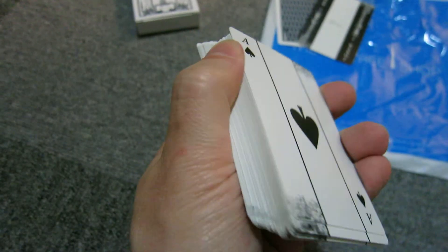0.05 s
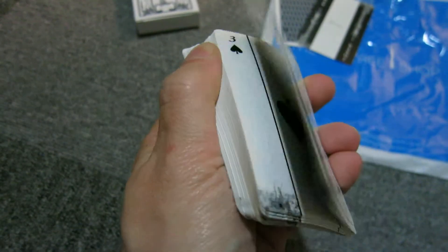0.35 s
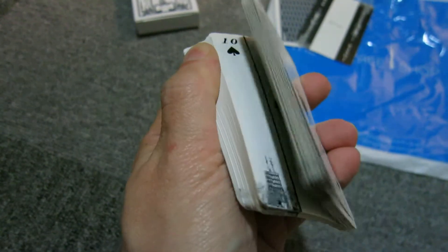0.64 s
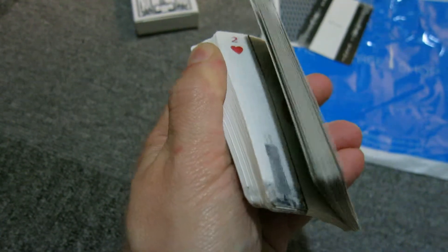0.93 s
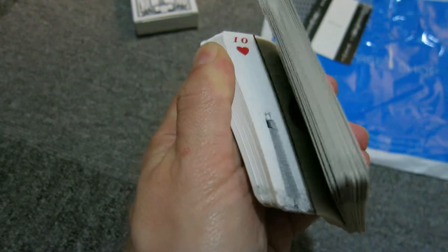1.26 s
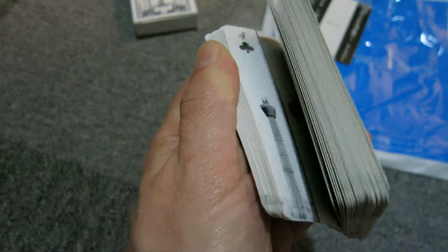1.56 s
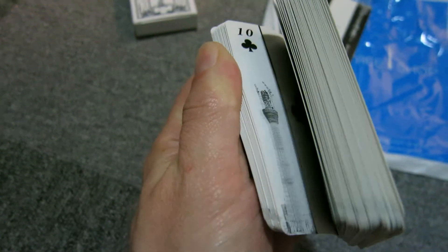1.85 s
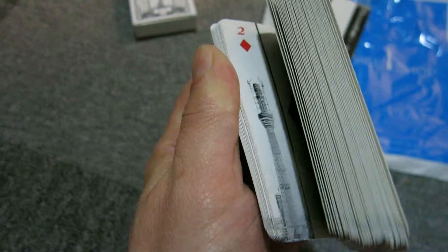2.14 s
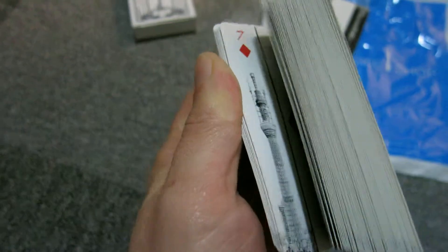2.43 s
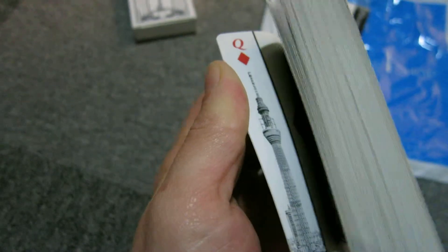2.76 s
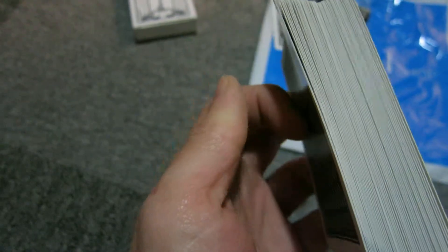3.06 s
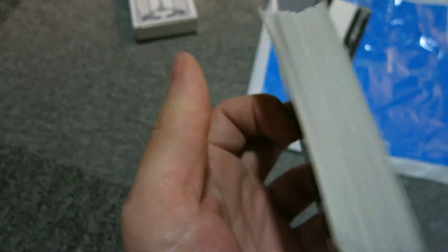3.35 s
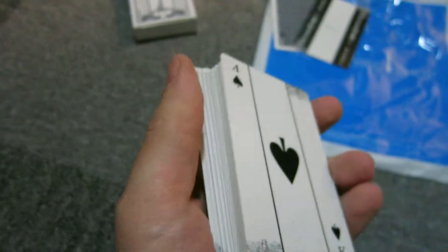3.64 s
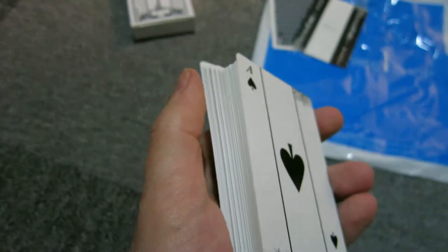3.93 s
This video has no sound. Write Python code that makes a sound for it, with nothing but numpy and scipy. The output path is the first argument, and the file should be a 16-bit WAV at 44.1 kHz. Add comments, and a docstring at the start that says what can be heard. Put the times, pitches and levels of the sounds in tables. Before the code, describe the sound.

A deck of playing cards is riffled close to the microphone. From about 0.3 to 2.7 seconds the cards click in a rapid, slightly uneven run with a faint rubbing hiss, and the hand bumps the deck softly at 1 second. After a short gap, the last card snaps loudest just before 3 seconds. A low room hum runs underneath and continues until 4 seconds.

```python
"""A deck of playing cards is riffled by a thumb, close to the microphone in a small, quiet room.
Each card slips off the thumb and snaps against the growing stack; the last one lets go hardest.
Card edges rub with a grainy hiss and the hand bumps the deck, over a low hum and rumble.
The recorder turns itself down after the loudest snap, then slowly comes back up."""
import sys
import numpy as np
from scipy import signal
from scipy.fft import rfft, irfft
from scipy.io import wavfile
from scipy.ndimage import uniform_filter1d, minimum_filter1d

SR = 44100
rng = np.random.default_rng(int(sys.argv[2]) if len(sys.argv) > 2 else 0)


def generate_wav(signal):
    """Clip the signal to [-1, 1] and save it as 16-bit WAV at the path in sys.argv[1]."""
    frames = np.transpose(np.atleast_2d(signal))
    scaled = np.clip(frames, -1, 1) * 32767
    pcm = np.round(scaled).astype(np.int16)
    wavfile.write(sys.argv[1], SR, pcm)


N = 176400
T = np.arange(N) / SR
SNAP_SIZE, SNAP_LEAD = 2048, 384  # samples in one snap, and how many come before the hit
SNAP_T = (np.arange(SNAP_SIZE) - SNAP_LEAD) / SR
FIRST_S, LAST_S = 0.34, 2.9596  # the stack grows between these times

# tone of the low rumble (frequency [Hz], level [dB])
RUMBLE_TONE = [(20, -58), (33, -39), (48, -7.5), (62, -1.5), (80, -1.5), (115, 3), (150, -3), (178, -10),
               (200, -8), (240, -9.5), (330, -21.5), (500, -61), (4000, -86)]
# loudness of the rumble (time [s], level [dB])
RUMBLE_LEVELS = [(0, -30.5), (.8, -29), (1.2, -29), (1.5, -25), (1.75, -29.5), (2.0, -34.5), (2.6, -29),
                 (3.0, -33.5), (4, -33)]
# loudness of the two hum tones (time [s], lower tone [dB], upper tone [dB])
HUM_LEVELS = [(0, -31.5, -37.5), (.25, -38, -31.5), (.55, -39, -26.5), (.75, -33.5, -36.5),
              (.95, -52, -43.5), (1.3, -31, -31), (1.55, -34, -25.5), (1.75, -35.5, -43), (2.0, -36.5, -42),
              (2.25, -42, -37.5), (2.55, -32, -43), (2.8, -35.5, -57), (3.05, -33.5, -40), (4, -36, -39.5)]
# tone of the air noise (frequency [Hz], level [dB])
AIR_TONE = [(150, -10), (350, 0), (470, -2.5), (590, 3), (660, -1.5), (740, 1.5), (880, -2), (1000, -2.5),
            (1200, -5), (1700, -6), (2050, -3), (2700, -5.5), (3300, -7), (4500, -14), (6500, -15.5),
            (9000, -28), (12000, -28), (14000, -42), (16500, -46)]
# faint background tones (pitch [Hz], width [Hz], level [dB])
WHIRR_TONES = [(199, 12.8, -44.5), (587.4, 13.3, -58), (734, 19, -55), (995, 14, -64.5), (1990, 78, -57)]
# tone of the room's echo (frequency [Hz], level [dB])
ECHO_TONE = [(200, -2), (600, 9), (3000, -4), (6000, 2.5), (12000, 0.5), (16000, -14)]
# how far the left microphone opening is ahead of the right (frequency [Hz], phase [radians])
LEFT_LEAD = [(0, 0.015), (5600, 0.34), (9000, 0.91), (12500, 0.94), (16000, 0.74)]
# how much louder the deck is on the left (frequency [Hz], level [dB])
LEFT_BOOST = [(1000, 1.5), (4000, -0.5), (7000, -0.5), (10000, 3), (13000, 5.8)]
# loudness of the rubbing edges (time [s], middle [dB], treble [dB])
RUB_LEVELS = [(0, -42.5, -51.5), (.25, -42, -50.5), (.45, -39.5, -47), (.9, -40.5, -50.5),
              (1.25, -35.5, -47.5), (1.52, -36, -46), (1.72, -39.5, -49.5), (2.0, -51.5, -55),
              (2.25, -49, -53.5), (2.62, -39.5, -48.5), (2.78, -59, -55), (2.95, -47, -57),
              (3.05, -52, -55.5), (4, -67, -56.5)]
# tone of the rubbing's middle range (frequency [Hz], level [dB])
RUB_MIDDLE_TONE = [(250, 0), (600, 2), (1300, -4), (2300, -0.5), (3500, -5.5), (6000, -17), (16000, -60)]
# tone of the rubbing's treble (frequency [Hz], level [dB])
RUB_TREBLE_TONE = [(2000, -40), (4000, 1.5), (6000, 7), (8500, 6), (9700, 0.5), (12800, -4), (14200, -11),
                   (16500, -38)]
# hand and deck ringing when bumped (time [s], pitch [Hz], decay [s], level [dB])
HAND_BUMPS = [(.319, 597, 0.016, -25.5), (1.012, 517, 0.022, -26.5), (1.016, 770, 0.035, -32),
              (1.016, 217.7, 0.054, -20.5), (2.707, 320, 0.0062, -26)]
# card sliding on card (time [s], rise [s], fall [s], pitch [Hz], width [Hz], level [dB])
CARD_SLIDES = [(1.115, 0.0067, 0.025, 1150, 900, -25.5), (1.115, .012, 0.046, 5000, 9000, -34.5),
               (2.5, 0.017, 0.01, 2600, 2400, -52), (2.853, 0.0071, 0.014, 4100, 4200, -38),
               (2.956, 0.019, .006, 4167, 4000, -37.5)]
# card edges catching faintly (time [s], level [dB])
EDGE_CATCHES = [(1.4359, -43.5), (2.3793, -45), (2.573, -28), (2.6349, -38), (2.8489, -51)]
# ways the last card vibrates (pitch [Hz], width [Hz], relative level [dB])
LAST_CARD_MODES = [(1920, 290, -12), (2710, 370, -1), (4000, 340, 2), (4740, 330, -1), (5980, 460, 2),
                   (11000, 2000, -11.5)]
# a card's higher vibrations (multiple of the crack pitch [ratio], width [Hz], relative level [dB])
CARD_CRACK_MODES = [(1.001, 576, 2), (1.33, 1210, -9)]
# cards leaving the thumb
# (time [s], body pitch [Hz], body level [dB], crack pitch [Hz], crack level [dB], tick level [dB])
CARD_SNAPS = [(0.3135, 3080, -24.5, 6740, -42, -38), (0.3273, 3240.0, -30, 7700.0, -32.5, -36),
              (0.3679, 4600, -24, 6500, -32.5, -35.5), (0.4311, 4200, -17.5, 6600.0, -30.5, -36),
              (0.4691, 3000.0, -20, 8600.0, -37, -33.5), (0.5066, 3700, -20, 7800.0, -43, -34.0),
              (0.5685, 3640.0, -13.5, 8200.0, -37, -32), (0.5855, 3400, -14, 7840, -33, -28),
              (0.6225, 3170, -19.5, 6600.0, -36, -22), (0.6618, 4040, -18.5, 9200.0, -40, -27),
              (0.7165, 3280, -17.5, 9200.0, -31, -24.5), (0.7602, 3270.0, -18.5, 7040, -37, -36.5),
              (0.8039, 3500.0, -18.5, 9000.0, -29, -25), (0.8796, 3400, -15, 8900.0, -33.5, -31),
              (0.948, 3250.0, -20.5, 7400.0, -32, -31.5), (0.9772, 3100, -21.5, 7400.0, -39.5, -29.5),
              (1.0181, 3800, -20.0, 7600, -28.5, -23), (1.0656, 2960, -23.5, 7240, -32, -31.0),
              (1.1005, 3560.0, -20.0, 7800, -29.5, -21.5), (1.147, 3840.0, -25, 6900.0, -25, -29),
              (1.1854, 3900, -20.0, 6750, -23, -25), (1.2151, 3600.0, -20, 6840, -25.5, -28),
              (1.258, 3970.0, -22, 6230, -19.5, -24.5), (1.3205, 4160.0, -22, 6100.0, -27, -23.5),
              (1.3547, 3710.0, -21.0, 6240, -23, -23.5), (1.3917, 3910.0, -19.5, 6360, -21.5, -22),
              (1.446, 4000, -27, 5900.0, -24.0, -23.5), (1.4832, 4100, -26.5, 6200.0, -23.5, -21.5),
              (1.5265, 4200, -24, 6100, -20, -19), (1.5873, 3900, -19, 6900, -27, -19.5),
              (1.6196, 3900, -25.5, 5900, -21.5, -21), (1.6676, 3670, -18, 7660, -20.5, -23),
              (1.7175, 4150.0, -25.5, 5600.0, -22.5, -23), (1.7548, 3850, -21.5, 6400, -25, -24.0),
              (1.7814, 3840, -22, 5900.0, -23, -23), (1.8305, 3700, -18.5, 5640, -23, -18.5),
              (1.8966, 3580.0, -24, 5860, -18.0, -22.5), (1.9766, 3700.0, -31, 5860, -26.0, -20.5),
              (2.029, 3930.0, -31.5, 5860, -25, -25.5), (2.0827, 3780.0, -30, 6800.0, -29.5, -28.0),
              (2.1346, 3600, -21.5, 7060, -23.5, -26.5), (2.1948, 3870, -21.5, 5400, -24.5, -23.5),
              (2.2459, 3760, -27, 5970, -19, -28.5), (2.307, 3240, -24.5, 8200, -27, -21),
              (2.3978, 3790.0, -25, 5500, -19.5, -22.5), (2.461, 3580, -18, 5760, -21, -28),
              (2.5398, 4230, -22, 6800.0, -21, -20), (2.5909, 3940, -19, 5370, -21.5, -26.5),
              (2.6458, 4300, -17.5, 8500, -20.5, -21.5), (2.7066, 3350, -15.0, 5960, -22, -25)]

# each of these runs in even steps from the first card to the last
BODY_WIDTH_HZ, BODY_LOW_HZ = (2770, 2400, 900, 930, 2600), (1850, 2010, 2830, 2900, 2070)
CONTACT_S, SCRAPE_SHARE = (.00012, .00018, .0004, .0005, .0008), (.6, .8, 1.5, 1.7, 1.9)
TICK_HZ = (10900, 11600, 11900, 11200, 11500)
RATTLE_DB, CHATTER_DB = (-14.5, -0.5, -10), (-35, -18, -16)


def undb(db):
    """Turn decibels into a gain."""
    return 10 ** (np.asarray(db) / 20)


def level(x, db):
    """Set the average (rms) level."""
    return x * undb(db) / np.sqrt(np.mean(x ** 2))


def burst(x, db, span_s=.002):
    """Set a click's level as if all its energy fell within span_s."""
    return x * undb(db) * np.sqrt(span_s * SR / (np.sum(x ** 2) + 1e-18))


def curve(table, column=1):
    """Gain over time from a table's dB column."""
    table = np.array(table)
    return undb(np.interp(T, table[:, 0], table[:, column]))


def colour(x, points, share=1):
    """Shape the tone along (frequency [Hz], level [dB]) points."""
    hz, db = np.array(points).T
    freqs = np.maximum(np.fft.rfftfreq(x.shape[-1], 1 / SR), 1)
    gain = undb(share * np.interp(np.log(freqs), np.log(hz), db))
    return irfft(rfft(x) * gain, x.shape[-1])


def resonate(x, hz, *widths_hz):
    """Ring at one pitch, once for each width; narrower rings longer."""
    for width in widths_hz:
        x = signal.lfilter(*signal.iirpeak(hz, hz / min(width, SR / 3), fs=SR), x)
    return x


def band_pass(x, low_hz, high_hz):
    """Keep the sound between two frequencies."""
    return signal.sosfilt(signal.butter(3, [low_hz, high_hz], "band", fs=SR, output="sos"), x)


def fade(t, decay_s):
    """Silent before time zero, then dying away."""
    return (t >= 0) * np.exp(-np.abs(t) / decay_s)


def grit(decay_s):
    """A burst of tiny contacts that builds quickly and dies away."""
    rise_s = 0.42 * min(decay_s, .001)
    shape = np.exp(-np.abs(SNAP_T) / np.where(SNAP_T < 0, rise_s, decay_s))
    contacts = rng.standard_normal(SNAP_SIZE) * shape
    return contacts / np.linalg.norm(contacts)


def noise_band(hz, *widths_hz):
    """Noise gathered around one pitch."""
    return resonate(rng.standard_normal(N), hz, *widths_hz)


def stereo_noise(side_db):
    """Noise for two ears; the lower side_db, the more alike they are."""
    mid, side = rng.standard_normal((2, N))
    return mid + undb(side_db) * side * np.array([[1], [-1]])


def add(out, snap, at_s):
    """Mix a snap in at its time."""
    start = int(round(at_s * SR)) - SNAP_LEAD
    out[start:start + len(snap)] += snap[:len(out) - start]


def background(hum_hz=(113.24, 153.2), left_db=0.36):
    """Low rumble, two wavering hum tones and soft air noise."""
    low = level(colour(stereo_noise(side_db=-18.5), RUMBLE_TONE), 0) * curve(RUMBLE_LEVELS)
    for column, hz in enumerate(hum_hz, start=1):
        waver = level(noise_band(hz, 16, 16), -9)
        tone = np.sin(2 * np.pi * (hz * T + rng.random()))
        low += level(tone + waver, 0) * curve(HUM_LEVELS, column)
    air = level(colour(stereo_noise(side_db=-11), AIR_TONE), -42.5)
    return low * undb(left_db * np.array([[.5], [-.5]])) + air


def whirr():
    """Faint narrow tones in the room's air noise."""
    return sum(level(noise_band(hz, width, 3 * width), db) for hz, width, db in WHIRR_TONES)


def room_echo(deck, db=-18.5, delay_s=0.0039, fall_60db_s=0.13):
    """A carpeted room answers with a faint, short echo."""
    t = T[:SR // 2]
    tail = colour(rng.standard_normal((2, len(t))), ECHO_TONE)
    tail *= fade(t - delay_s, fall_60db_s / np.log(1000))
    tail *= undb(db) / np.sqrt(np.sum(tail ** 2) / 2)
    return signal.fftconvolve(deck[None], tail, axes=1)[:, :N]


def microphone(deck):
    """Two microphone openings hear the deck at slightly different levels and times."""
    hz, radians = np.array(LEFT_LEAD).T
    lead = np.interp(np.fft.rfftfreq(N, 1 / SR), hz, radians)
    channels = []
    for side in (1, -1):  # left, right
        shifted = irfft(rfft(deck) * np.exp(.5j * side * lead), N)
        channels.append(colour(shifted, LEFT_BOOST, share=side / 2))
    return np.array(channels)


def rubbing(flicker_db=2.84):
    """Card edges creep under the thumb with a fine, grainy hiss."""
    flicker = level(uniform_filter1d(rng.standard_normal(N), size=120), 0)
    grain = undb(flicker_db * flicker)
    middle = level(colour(grain * stereo_noise(side_db=-12), RUB_MIDDLE_TONE), 0)
    treble = level(colour(grain * stereo_noise(side_db=0), RUB_TREBLE_TONE), 0)
    return middle * curve(RUB_LEVELS, column=1) + treble * curve(RUB_LEVELS, column=2)


def handling(thump_at_s=1.014, thump_hz=125.8):
    """The deck shifts in the hand: a soft thump, dull bumps and short slides of card on card."""
    age = np.maximum(T - thump_at_s, 0)
    swell = (1 - np.exp(-age / 0.014)) * fade(age, decay_s=0.025)
    out = undb(-6) * np.sin(2 * np.pi * thump_hz * age) * swell
    for at, hz, decay, db in HAND_BUMPS:
        age = T - at
        ring = np.sin(2 * np.pi * hz * age) + level(noise_band(hz, hz / 2, hz), -4)
        out += undb(db) * ring * fade(age, decay) * np.clip(age / 0.0025, 0, 1)
    for at, rise, fall, hz, width, db in CARD_SLIDES:
        swell = np.exp(-np.abs(T - at) / np.where(T < at, rise, fall))
        out += level(noise_band(hz, width, 2 * width), db) * swell
    return out


def drag():
    """A card's edge drags over the thumb, growing louder until it lets go."""
    friction = rng.standard_normal(SNAP_SIZE) * fade(-SNAP_T, 0.0015)
    return undb(-12.5) * friction / np.linalg.norm(friction)


def chatter(count=3):
    """The edge sticks and slips on the thumb a few times just before the snap."""
    leads_s = rng.uniform(.001, 0.0044, count)
    sizes = rng.standard_normal(count)
    clicks = sum(size * (np.abs(SNAP_T + lead) < .5 / SR) for lead, size in zip(leads_s, sizes))
    return clicks / np.sqrt(count)


def knock(stack, hz=298):
    """The stack gives a hollow thud and a dull tap, louder as it grows from 0 (empty) to 1 (full)."""
    thud = resonate(grit(0.0054), hz, 340, 490)
    tap = band_pass(grit(.003), 500, 3040)
    thinness = 1 - stack ** 2
    return burst(thud, -22.5 - 25 * thinness) + burst(tap, -22.5 - 13 * thinness)


def crack(push, pitch_hz, scatter_db=3):
    """A card's higher vibrations make a sharp crack, a little different each time."""
    modes = sum(undb(db + scatter_db * rng.standard_normal()) * resonate(push, ratio * pitch_hz, width)
                for ratio, width, db in CARD_CRACK_MODES)
    return band_pass(modes, 5000, 9200)


def last_card(rebound_s=.0011, ring_hz=6150):
    """The last card springs free, slaps the deck, bounces once and rings briefly."""
    out = np.zeros(N)
    for lag, slap_db in ((0, -5.5), (rebound_s, -10.5)):
        push = grit(.0006) + undb(-18.5) * grit(0.0088)
        slap = sum(burst(resonate(push, hz, width, 3 * width), db) for hz, width, db in LAST_CARD_MODES)
        add(out, burst(slap, slap_db), LAST_S + lag)
    ring = np.sin(2 * np.pi * ring_hz * SNAP_T) * fade(SNAP_T, decay_s=.012)
    add(out, burst(ring, -32) + undb(4.5) * knock(stack=0.95), LAST_S)
    return out


def by_stack(steps, stack):
    """Read a setting for a stack between 0 (empty) and 1 (full)."""
    return np.interp(stack, np.linspace(0, 1, len(steps)), steps)


def riffle(rattle_s=0.0026, slip_from_s=2.5):
    """Each card hits the stack and ticks, rings, rattles and knocks; a thicker stack scrapes longer."""
    out = np.zeros(N)
    for at, body_hz, body_db, crack_hz, crack_db, tick_db in CARD_SNAPS:
        stack = np.clip((at - FIRST_S) / (LAST_S - FIRST_S), 0, 1)
        release = drag() + undb(by_stack(CHATTER_DB, stack)) * chatter()
        scrape = by_stack(SCRAPE_SHARE, stack) * grit(by_stack(CONTACT_S, stack))
        strike = release + (SNAP_T == 0) + scrape  # the one-sample click is the hit itself
        rattle = undb(by_stack(RATTLE_DB, stack)) * grit(rattle_s)
        push = strike + rattle
        body = resonate(push, body_hz, by_stack(BODY_WIDTH_HZ, stack))  # the card's lower ring
        body = band_pass(body, by_stack(BODY_LOW_HZ, stack), 4810)
        ring = burst(body, body_db) + burst(crack(push, crack_hz), crack_db)
        edge = strike + undb(-3.5) * rattle + grit(0.00019)  # the rattle is duller than the hit
        tick = band_pass(resonate(edge, by_stack(TICK_HZ, stack), 2500), 9000, 14450)
        add(out, ring, at)
        add(out, burst(tick, tick_db), at - .0002 * (2 * stack - 1))
        add(out, knock(stack), at + 0.00052)
        if at > slip_from_s:  # the late cards slip just before they snap
            slip = signal.fftconvolve(ring, grit(rattle_s))[SNAP_LEAD:SNAP_LEAD + SNAP_SIZE]
            add(out, undb(-10) * slip, at - 0.0045)
    for at, db in EDGE_CATCHES:
        add(out, burst(band_pass(grit(0.00036), 2800, 8600), db), at)
    return out


def scene():
    """The deck sits a little to the left, over the room's echo and hum."""
    deck = riffle() + last_card() + handling()
    return microphone(deck) + room_echo(deck) + rubbing() + background() + whirr()


def record(dry, ceiling_db=-10, recover_db_per_s=6.5, peak_limit=0.68, top_hz=16400):
    """The recorder turns down on a loud snap and recovers slowly; it rounds peaks and cuts the top."""
    power = uniform_filter1d(np.mean(dry ** 2, axis=0), size=32)
    over_db = np.maximum(10 * np.log10(np.maximum(power, 1e-12)) - ceiling_db, 0)
    recovery_db = recover_db_per_s * T
    cut_db = np.maximum.accumulate(over_db + recovery_db) - recovery_db
    gain = uniform_filter1d(minimum_filter1d(undb(-cut_db), size=64), size=64)
    lowered = dry * gain
    rounded = lowered / (1 + (lowered / peak_limit) ** 6) ** (1 / 6)
    return signal.sosfilt(signal.ellip(8, .2, 70, top_hz, fs=SR, output="sos"), rounded)


dry = scene()
out = record(dry)
generate_wav(out)
```